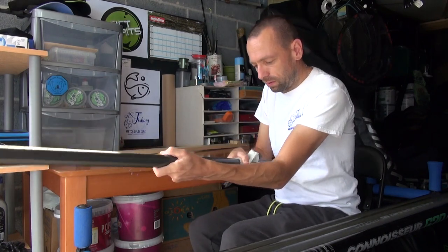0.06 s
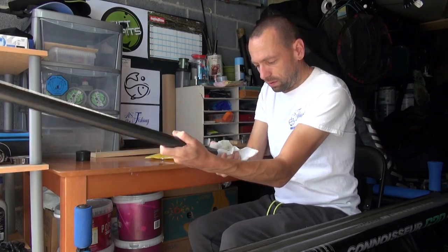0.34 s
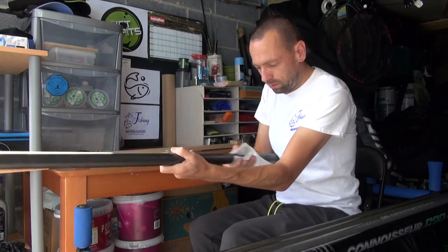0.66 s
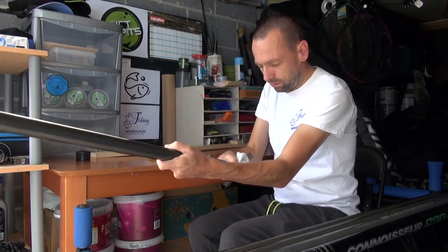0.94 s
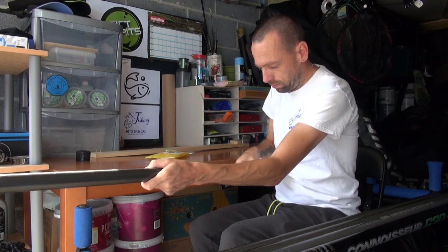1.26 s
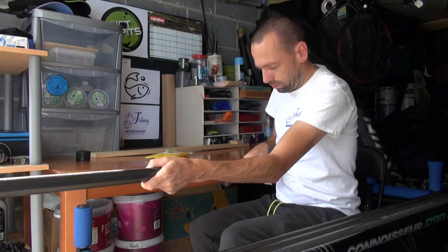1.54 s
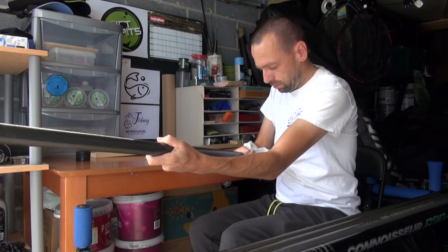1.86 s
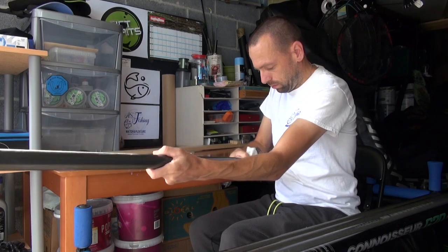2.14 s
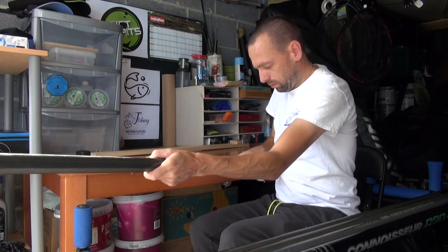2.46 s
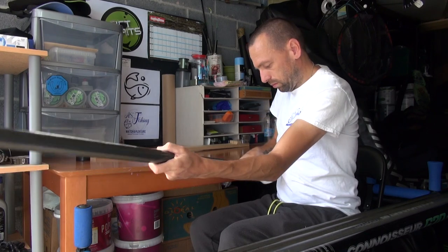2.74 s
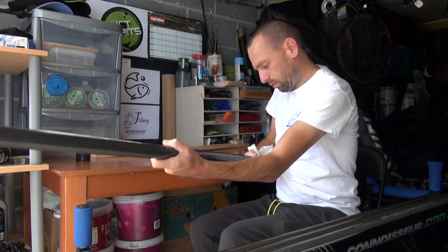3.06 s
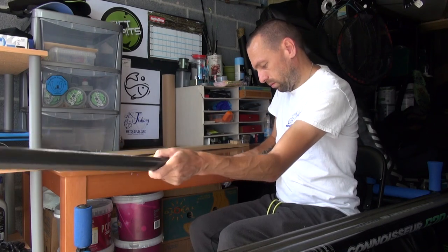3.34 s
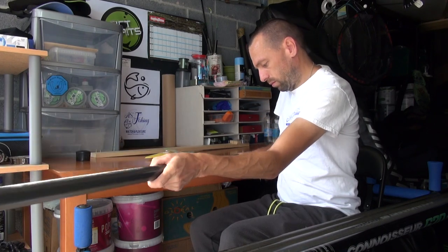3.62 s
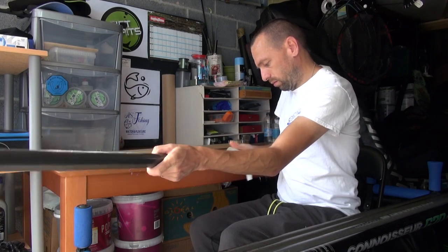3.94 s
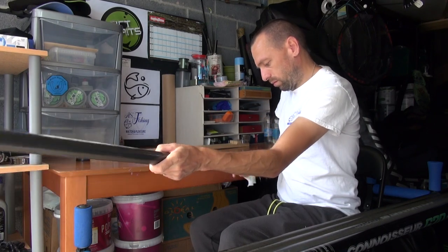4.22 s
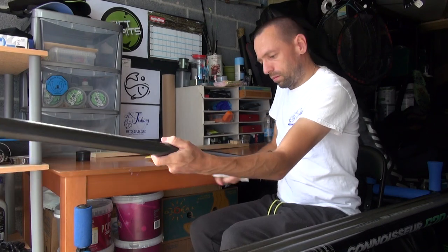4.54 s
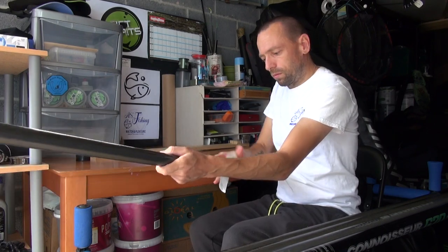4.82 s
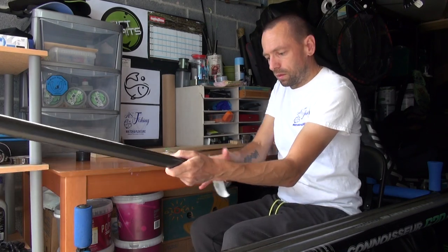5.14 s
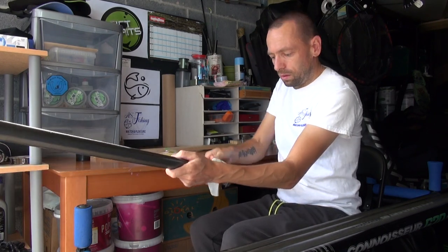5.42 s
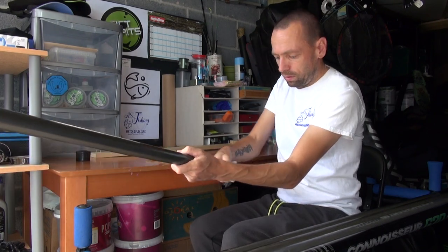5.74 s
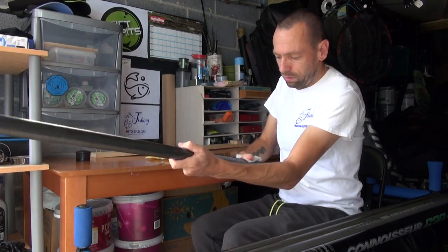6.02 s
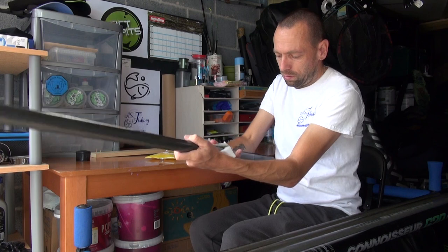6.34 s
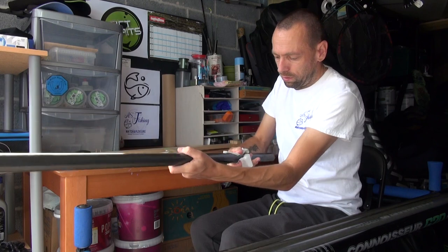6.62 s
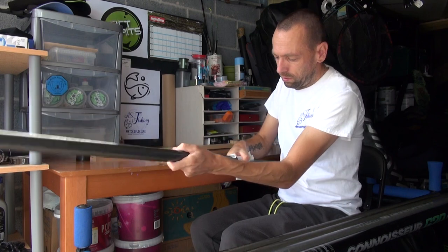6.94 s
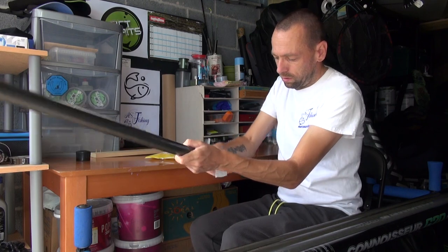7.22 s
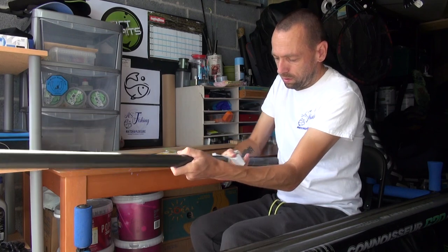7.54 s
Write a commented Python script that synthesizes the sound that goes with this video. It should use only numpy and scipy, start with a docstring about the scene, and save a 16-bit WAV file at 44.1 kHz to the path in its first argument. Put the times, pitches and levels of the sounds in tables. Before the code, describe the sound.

Short, hissy rubbing strokes on a hollow fishing pole, broken by occasional sharp taps, over faint indoor room noise.

```python
"""Wiping a carbon fishing pole

A wipe scrubs up and down a hollow pole in a cluttered workshop, a little way from a mono microphone.
Fibres catch and slip on the wall: they hiss and ring the tube, more so under a tight grip.
The damp wipe squeaks; the pole is knocked and shifted; something small tinkles faintly.
A few soft tones swell and fade. Steady room noise, mains hum and a thin whine lie underneath."""
import sys
import numpy as np
from scipy import signal
from scipy.fft import rfft, irfft, next_fast_len
from scipy.io import wavfile

SR = 44100
rng = np.random.default_rng(int(sys.argv[2]) if len(sys.argv) > 2 else 0)


def log_audio(samples):
    """Write samples as a 16-bit WAV file to the path given in sys.argv[1]."""
    # one column per channel
    frames = np.atleast_2d(samples).T
    # limit to full scale, then quantise
    limited = np.clip(frames, -1, 1)
    pcm = np.round(limited * 32767).astype(np.int16)
    wavfile.write(sys.argv[1], SR, pcm)


N = 338247
T = np.arange(N) / SR

# Wipe strokes. Each row: start, length and speed-up or stopping time in seconds, base level in dB,
# pressure swell in dB, then the grip: fibre hiss, upper ring and lower ring in dB relative to the wall.
STROKES = [ (-0.15, 0.19, 0.076, -34, 0, -9, 0, 1), (0.061, 0.38, 0.14, -34, 3, -1.5, -2, -3.5),
           (0.405, 0.25, 0.15, -30.5, 17, -5, -7, -7), (0.604, 0.28, 0.15, -32, 11, -3.5, -6, -3.5),
           (0.831, 0.44, 0.12, -36, 5.5, -4.5, -7.5, -8), (1.115, 0.36, 0.11, -36, 14.5, -1.5, -7.5, -6),
           (1.377, 0.18, 0.04, -38.5, -1.5, -1.5, -2, -11),
           (1.587, 0.53, 0.19, -38, -29.5, -3.5, -5.5, -6.5), (2.082, 0.3, 0.092, -38, 11, -6, -4, -0.5),
           (2.343, 0.29, 0.11, -35.5, 0.5, -4, -0.5, -4.5), (2.68, 0.37, 0.12, -32, 6, -26, 1.5, -7),
           (3.112, 0.445, 0.12, -31, 0.5, -25, 3.5, -5.5), (3.394, 0.27, 0.13, -33, -14, -4, -3.5, -1),
           (4.037, 0.14, 0.073, -40, 1, -17, 11, 7), (4.098, 0.22, 0.069, -50, -5, -12, -0.5, 1.5),
           (4.277, 0.23, 0.084, -27, -8, -11, 8.5, 3.5), (4.734, 0.25, 0.1, -54, -7, -20, 1.5, 11),
           (4.923, 0.4, 0.15, -50, 13, 0, -6, -2), (5.073, 0.17, 0.081, -45.5, -4, -10, 4, -5),
           (5.474, 0.29, 0.1, -51.5, 19, -2, -14, -6), (5.684, 0.36, 0.11, -38.5, 20.5, -4, -1, -4),
           (6.012, 0.4, 0.15, -34.5, 2.5, -5, 0.5, -3.5), (6.326, 0.44, 0.23, -33, 7, -3.5, 0, -2),
           (6.645, 0.31, 0.14, -35, 7, -5.5, -4, -5.5), (6.91, 0.5, 0.18, -36.5, 3, -4.5, -3.5, -5.5),
           (7.33, 0.48, 0.15, -37, 10.5, -2.5, -3.5, -3.5), ]
# Tube resonances. Each row: frequency in Hz, width in Hz, relative gain in dB.
TUBE_MODES = [(1048, 42, 0), (1107, 52, -4.5), (1245, 105, -4.5), (1710, 170, -4), (2024, 120, -7),
              (2210, 102, 5), (2370, 106, 4.5), (2530, 110, -3), (2760, 80, -1.5), (3047, 84, -3),
              (3340, 65, -5), (3990, 380, -7.5), (4720, 190, -14)]
# Wall friction. Each row: frequency in Hz, relative density in dB.
WALL_SPECTRUM = [(60, -17), (130, -3), (300, -6), (600, -4.5), (900, -4), (1450, -0.5), (2400, 2),
                 (3500, -1), (4700, -0.5), (6500, -5), (8000, -8), (11000, -9.5), (15500, -24)]
# Loose-fibre hiss. Each row: frequency in Hz, relative density in dB.
FIBRE_SPECTRUM = [(1000, -32), (5000, -9), (8000, -7), (10000, -5.5), (11500, -5.5), (12500, -8),
                  (15500, -10)]
# Wipe squeaks. Each row: centre in seconds, half length in seconds, top pitch in Hz, peak in dB.
SQUEAKS = [(3.075, 0.012, 4370, -54), (5.165, 0.025, 4870, -52), (5.585, 0.045, 4030, -55),
           (5.649, 0.045, 4820, -49.5)]
# Pole knocks. Each row: start in seconds, peak in dB, contact centre in Hz, relative tube ring in dB.
KNOCKS = [(1.718, -15, 3920, -3), (1.7202, -29, 3500, 2), (1.8189, -22, 1200, -2), (1.8243, -23, 1300, -9),
          (1.829, -17.5, 2700, -15), (3.448, -21, 2500, 13), (4.0108, -23.5, 980, -4),
          (4.011, -29.5, 3600, -13), (4.018, -26, 2550, -8), (5.359, -34, 5500, -12),
          (5.366, -38, 4000, -6)]
# Arms and wipe shifting. Each row: start in seconds, length in seconds, level in dB.
RUSTLES = [(0.548, 0.42, -46.5), (1.844, 0.23, -52), (2.103, 0.54, -67), (4.784, 0.21, -48),
           (4.978, 0.33, -56)]
# Pole against the body. Each row: start in seconds, gain in dB, frequency in Hz, t60 in seconds.
BUMPS = [(0.575, -40, 175, 0.17), (4.011, -20, 174, 0.04), (4.015, -35, 330, 0.08),
         (4.824, -43, 165, 0.061), (4.872, -43, 139, 0.065)]
# Soft tones. Each row: centre in seconds, half length in seconds, frequency in Hz, peak in dB.
TONES = [(2.177, 0.013, 1055, -37.5), (2.305, 0.073, 771, -40.5), (2.423, 0.067, 776, -47)]
# Touches on a small object. Each row: start in seconds, low mode in dB, high mode in dB.
TINKLES = [(1.247, -65, -33), (1.295, -65, -46), (1.479, -34, -54), (1.579, -54, -56), (1.606, -43, -58),
           (5.678, -53, -36), (5.731, -68, -50), (7.377, -44, -57)]
# That object's modes. Each row: frequency in Hz, t60 in seconds.
TINKLE_MODES = [(7000, 0.044), (14330, 0.054)]
# Room noise. Each row: frequency in Hz, relative density in dB.
ROOM_SPECTRUM = [(30, -32), (60, -15.5), (100, -5.5), (150, -7.5), (280, -4), (500, -4.5), (850, -0.5),
                 (1200, -3.5), (1550, -7), (2200, -10), (3300, -15.5), (4700, -18), (8000, -26),
                 (15500, -34)]
# Mains hum and electronic whine. Each row: frequency in Hz, rms level in dB.
HUM_LINES = [(100, -72), (150, -66.5), (10923, -85), (13474, -82.5)]


def wiping(wall_db=1, upper_db=-1, lower_db=-3, fibre_db=-1, judder_db=0.64, coupling_db=2.2,
           split_hz=1800, fibre_exponent=0.34, usual_rub_db=-41):
    """Slipping fibres hiss and drive the tube; each mode's share drifts, as under a moving hand."""
    rub, loose, upper, lower = stroke_envelopes()
    judder = undb(judder_db * walk(220))
    friction = judder * slips(rate_hz=16000, spread_db=0.6)
    modes = [(hz, undb(db + coupling_db * walk(2.9)) * resonate(friction, hz, width_hz))
             for hz, width_hz, db in TUBE_MODES]
    upper_ring = undb(upper_db) * upper * unit(sum(mode for hz, mode in modes if hz > split_hz))
    lower_ring = undb(lower_db) * lower * unit(sum(mode for hz, mode in modes if hz <= split_hz))
    wall_slips = judder * slips(rate_hz=24000, spread_db=0.5)
    wall = undb(wall_db) * rub * unit(colour(wall_slips, WALL_SPECTRUM))
    fibre_slips = judder * slips(rate_hz=24000, spread_db=-2.8)
    brightness = undb(fibre_db) * (rub / undb(usual_rub_db)) ** fibre_exponent  # faster is brighter
    fibres = brightness * loose * unit(colour(fibre_slips, FIBRE_SPECTRUM))
    return wall + upper_ring + lower_ring + fibres


def stroke_envelopes():
    """Amplitudes of wall, fibres, upper and lower ring: the grip shares out the friction power."""
    power = np.zeros((4, N))
    for start_s, length_s, turn_s, db, swell_db, *grip_db in STROKES:
        shares = np.r_[1, undb(grip_db) ** 2]
        span = slice(max(int(start_s * SR), 0), int((start_s + length_s) * SR))
        level = stroke_level(T[span] - start_s, length_s, turn_s, db, swell_db)
        power[:, span] += np.outer(shares / shares[:3].sum(), level ** 2)
    return np.sqrt(power)


def stroke_level(age_s, length_s, turn_s, db, swell_db, speed_exponent=2.5):
    """Friction amplitude: the hand speeds up, glides and stops while its pressure ramps."""
    starting = np.sin(np.pi / 2 * np.clip(age_s / turn_s, 0, 1))
    stopping = np.sin(np.pi / 2 * np.clip((length_s - age_s) / turn_s, 0, 1))
    pressure = undb(db + swell_db * (age_s / length_s - 0.5))
    return (starting * stopping) ** speed_exponent * pressure


def slips(rate_hz, spread_db):
    """Dense, tiny fibre releases of random size."""
    released = rng.random(N) < rate_hz / SR
    size = undb(spread_db * np.minimum(rng.exponential(size=N), 5))
    return unit(released * size * rng.standard_normal(N))


def squeaks(jitter=0.032, arch=0.028):
    """Near-regular stick-slip: a rough whistle whose pitch rises and falls with its strength."""
    out = np.zeros(N)
    for centre_s, half_s, hz, db in SQUEAKS:
        swell = bell_curve(centre_s, half_s)
        pitch_hz = hz * (1 + arch * (swell - 1) + jitter * walk(1500))
        out += undb(db) * swell * sine(pitch_hz)
    return out


def knocks(scuff_t60_s=0.058, ring_db=10, push=6, relative_width=0.6, damping_scale=0.7):
    """A sharp push and short scuff ring the tube, less damped than under the wipe."""
    out = np.zeros(N)
    for start_s, peak_db, centre_hz, tube_db in KNOCKS:
        force = rng.standard_normal(SR // 2) * fade(scuff_t60_s)
        force[0] = push
        contact = resonate(force, centre_hz, relative_width * centre_hz)
        tube = sum(undb(db) * resonate(contact, hz, damping_scale * width_hz)
                   for hz, width_hz, db in TUBE_MODES)
        blow = contact + undb(tube_db + ring_db) * tube
        add(out, start_s, undb(peak_db) * blow / np.abs(blow).max())
    return out


def handling(body_hz=158, width_hz=100, rest_db=-70, attack_s=0.03, bump_rise_s=0.043):
    """Moving the pole about makes low rustles and padded bumps."""
    level = undb(rest_db)
    for start_s, length_s, db in RUSTLES:
        level += undb(db) * np.interp(T, [start_s, start_s + attack_s, start_s + length_s], [0, 1, 0])
    band = resonate(rng.standard_normal(N), body_hz, width_hz)
    out = level * unit(resonate(band, body_hz, width_hz))
    for start_s, db, hz, t60_s in BUMPS:
        add(out, start_s, undb(db) * ring(hz, t60_s) * (1 - fade(bump_rise_s)))
    return out


def tinkles():
    """A small hard object, touched, rings in two high modes."""
    out = np.zeros(N)
    for start_s, *levels_db in TINKLES:
        for db, (hz, t60_s) in zip(levels_db, TINKLE_MODES):
            add(out, start_s, undb(db) * ring(hz, t60_s))
    return out


def soft_tones(waver_hz=4):
    """Brief, nearly pure tones swell and fade."""
    return sum(undb(db) * bell_curve(centre_s, half_s) * sine(hz + waver_hz * walk(60))
               for centre_s, half_s, hz, db in TONES)


def workshop(direct, t60_s=0.11, wet_db=-11, damp_hz=5000, build_s=0.028):
    """Shelves and walls scatter a short, duller tail."""
    tail = rng.standard_normal(SR // 2) * fade(t60_s) * (1 - fade(build_s))
    tail = signal.lfilter(*signal.butter(1, damp_hz, fs=SR), tail / np.linalg.norm(tail))
    return direct + undb(wet_db) * signal.fftconvolve(direct, tail)[:N]


def background(noise_db=-50):
    """Steady room noise, mains hum and electronic whine."""
    air = undb(noise_db) * unit(colour(rng.standard_normal(N), ROOM_SPECTRUM))
    hum = sum(np.sqrt(2) * undb(db) * np.sin(2 * np.pi * hz * T) for hz, db in HUM_LINES)
    return air + hum


def undb(db):
    """Decibels to gain."""
    return 10 ** (np.asarray(db) / 20)


def unit(x):
    """Scale to rms 1."""
    return x / np.sqrt(np.mean(x ** 2))


def colour(x, spectrum):
    """Filter by (Hz, dB) points."""
    hz, db = np.transpose(spectrum)
    size = 2 * next_fast_len(len(x))
    bins_hz = np.maximum(np.fft.rfftfreq(size, 1 / SR), 1)
    gain = undb(np.interp(np.log(bins_hz), np.log(hz), db))
    return irfft(rfft(x, size) * gain)[:len(x)]


def resonate(x, hz, width_hz):
    """Two-pole resonance, gain 1 at the centre."""
    return signal.lfilter(*signal.iirpeak(hz, hz / width_hz, fs=SR), x)


def walk(rate_hz):
    """Random drift, spread near 1."""
    return 1.2 * np.interp(T * rate_hz, np.arange(32768), rng.standard_normal(32768))


def bell_curve(centre_s, half_s):
    """Gaussian envelope, 1/e at half_s from the centre."""
    return np.exp(-((T - centre_s) / half_s) ** 2)


def sine(pitch_hz):
    """Sine following a pitch curve."""
    return np.sin(2 * np.pi * np.cumsum(pitch_hz) / SR)


def fade(t60_s):
    """Exponential decay, half a second long."""
    return np.exp(-np.log(1000) * T[:SR // 2] / t60_s)


def ring(hz, t60_s):
    """One struck mode."""
    return np.sin(2 * np.pi * hz * T[:SR // 2]) * fade(t60_s)


def add(out, start_s, sound):
    """Mix a sound in at start_s."""
    start = max(int(start_s * SR), 0)
    out[start:start + len(sound)] += sound[:N - start]


def scene():
    """One microphone, the same in both channels."""
    direct = wiping() + squeaks() + knocks() + handling() + tinkles()
    mono = workshop(direct) + soft_tones() + background()
    return np.array([mono, mono])


def record(dry, low_cut_hz=64, high_cut_hz=15750):
    """Cut the deep bass and the top."""
    thin = signal.sosfilt(signal.butter(5, low_cut_hz, "high", fs=SR, output="sos"), dry)
    return signal.sosfilt(signal.ellip(14, 0.1, 70, high_cut_hz, fs=SR, output="sos"), thin)


dry = scene()
out = record(dry)
log_audio(out)
```